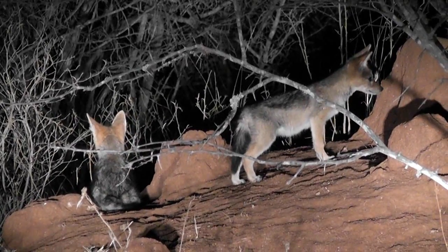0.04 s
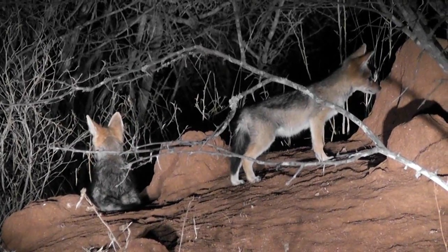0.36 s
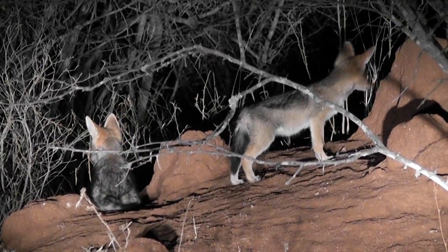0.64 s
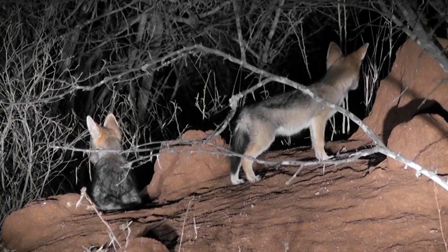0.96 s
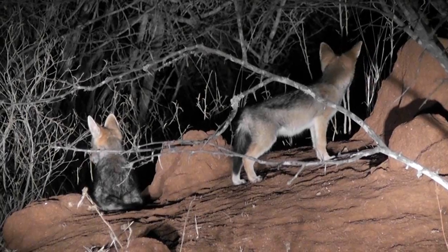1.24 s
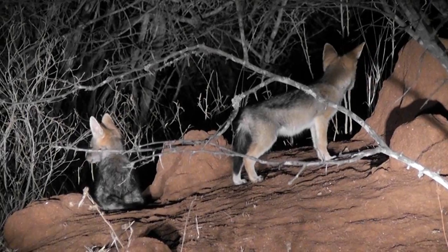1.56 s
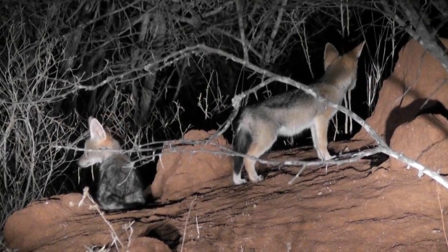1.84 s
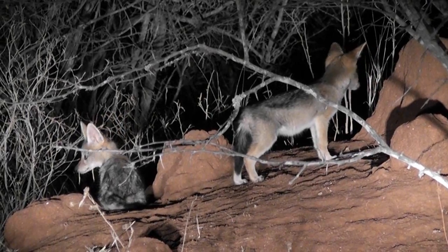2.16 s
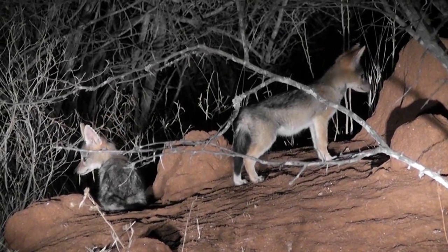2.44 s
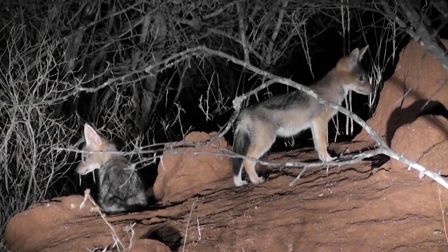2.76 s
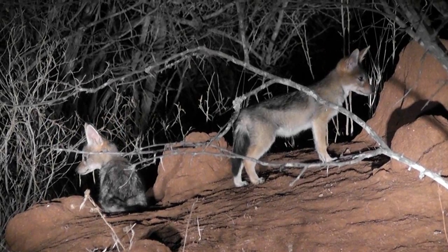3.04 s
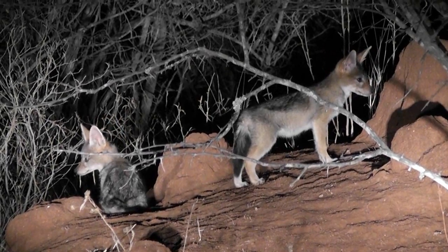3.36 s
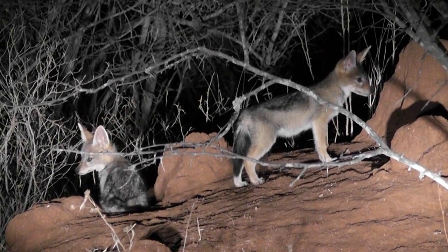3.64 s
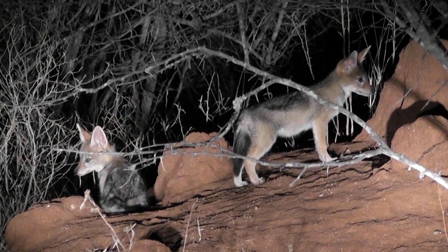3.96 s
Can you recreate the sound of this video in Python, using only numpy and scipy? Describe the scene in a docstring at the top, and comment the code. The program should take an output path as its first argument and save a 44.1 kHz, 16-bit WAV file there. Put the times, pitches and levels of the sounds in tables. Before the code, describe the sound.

An animal whines at once, low and creaky, rising in pitch and fading by 0.8 seconds, while a thin howl swoops far to the right. The howl returns at 1 second and yodels until about 1.9. From 3.2 seconds a second low whine swells into a rough creak. Throughout, crickets chirp, katydids rasp and another insect rattles over a distant insect chorus, night hiss and a faint low hum.

```python
"""Night among rocks and brush. At once an animal whines, its vocal folds creaking an octave down by period
doubling, while far to the right a thin howl, perhaps a coyote, swoops. The howl returns after a second
and ends in a yodel; two faint far tones come and go. After three seconds a second low whine breaks into
a rough creak. Throughout, crickets, katydids and a rattling insect stridulate over a distant insect
chorus, hiss and a low hum."""
import sys
import numpy as np
from scipy import signal
from scipy.fft import rfft, irfft
from scipy.io import wavfile
from scipy.ndimage import uniform_filter1d

SR = 44100
rng = np.random.default_rng(int(sys.argv[2]) if len(sys.argv) > 2 else 0)


def int16_out(signal):
    """Quantize to a 16-bit WAV file."""
    q = np.round(np.clip(np.atleast_2d(signal).T, -1, 1) * 32767)
    wavfile.write(sys.argv[1], SR, q.astype(np.int16))


N = 176400
T = np.arange(N) / SR

# One contour per whine: t/s, f/Hz, level/dB, subharmonic gain/dB, spectral tilt/(dB per octave)
WHINE_CONTOURS = [
    [(0, 241.7, -39.5, -4, 3), (.15, 240, -38.5, -4, 1.5), (.264, 243, -41, -6.5, -3),
     (.38, 249.2, -39.5, -8.5, -1.5), (.428, 262.2, -39.5, 7, 10), (.46, 297, -37.5, -12, -4),
     (.48, 309, -36.5, -29, -3), (.51, 327.5, -35.5, -40, 5), (.525, 353, -46.5, -30, 13),
     (.56, 396, -40.5, -28, -19), (.6, 480, -36, -34, -15), (.636, 583, -43.5, -29, 2),
     (.665, 634, -33, -10, 16.5), (.69, 571, -31.5, -28, -8), (.705, 495, -38, -38, -3),
     (.725, 455, -50.5, -16, 2), (.755, 420, -56, -25, -13)],
    [(3.19, 176, -72, -35, 4), (3.235, 184.8, -59.5, -33, 1), (3.29, 191.6, -50.5, -33, 7.5),
     (3.35, 204.7, -52.5, -28, -2), (3.42, 212, -50, -21, 2), (3.55, 225.6, -51, -26, 1.5),
     (3.62, 228.5, -48.5, -17, -4), (3.7, 235.3, -45.5, -8, -3), (3.76, 235.7, -42.5, 8.5, 2),
     (3.84, 241.5, -41, 7, 4.5), (3.914, 246.9, -40.5, 14, 4), (4, 253.3, -40, 9, 8)],
]
# Throat response for each whine: f/Hz, gain/dB
THROAT_RESPONSES = [
    [(110, -51), (240, -28.5), (305, -24), (360, 7.5), (480, -4.5), (610, 2.5), (725, 4.5), (785, -7),
     (850, -14), (950, -32.5), (1130, -29), (1245, -26), (1340, -44), (1900, -55)],
    [(110, -29), (235, -14), (305, -3), (360, 9.5), (470, 3.5), (600, 3.5), (720, 4.5), (815, 7.5),
     (870, -12.5), (940, -9.5), (1030, -25), (1180, -30), (1320, -21.5), (1480, -37), (1900, -35)],
]
# Roughness of the last creak: t/s, modulation depth
ROUGHNESS = [(3.55, 0), (3.7, 0.09), (3.8, 0.06), (3.9, 0.2), (4, 0.19)]

def whine(contour, throat):
    """Source and filter: folds drive a closed throat; alternating strong and weak pulses add f/2 lines."""
    gate, hz, db, creak_db, tilt_db = follow(contour)
    hz = uniform_filter1d(hz, size=500) * (1 + .0019 * drift(hz=50))
    phase = 2 * np.pi * np.cumsum(hz) / SR
    roughness = follow(ROUGHNESS)[1]
    wander_rad = .068 + .7 * roughness
    voice = power = 0
    for k in np.arange(1, 16) / 2:
        partial_db = read(throat, k * hz) + tilt_db * np.log2(k) + creak_db * (k % 1 > 0)
        gain = amp(partial_db) * (k * hz < 2000)
        lag_rad = 3.61 * (k * hz / 600) ** 2  # the throat delays the upper partials
        voice += gain * np.cos(k * phase - lag_rad + wander_rad * drift(hz=25))
        power += gain ** 2 / 2
    flutter = 1 + roughness * (np.cos(phase / 4) + .4 * drift(hz=60))  # swells every fourth pulse
    return gate * amp(db) * flutter * voice / np.sqrt(power)


def whining_animal(echo_s=.03):
    """Reflection: the direct whines are followed by an echo off the rock and faint reverberation."""
    voice = sum(whine(contour, throat) for contour, throat in zip(WHINE_CONTOURS, THROAT_RESPONSES))
    echo = np.interp(T - echo_s, T, voice, left=0)
    return voice + amp(-16) * echo + amp(-18) * reverberation(voice).mean(0)


# One contour per howl: t/s, f/Hz, relative level/dB
HOWL_CONTOURS = [
    [(0, 1700, -56), (.04, 2020, -52), (.066, 1350, -61), (.09, 1200, -73), (.2, 1174, -70),
     (.3, 1286, -65), (.42, 1454, -53.5), (.48, 1740, -58), (.55, 1955, -60), (.632, 2140, -61),
     (.652, 1626, -55), (.69, 1440, -54), (.74, 1444, -66), (.77, 1422, -83)],
    [(1.035, 1580, -55), (1.065, 1950, -60), (1.097, 2030, -53), (1.12, 1338, -58), (1.145, 1233, -70),
     (1.18, 1420, -59), (1.225, 1800, -60), (1.385, 2160, -63), (1.418, 1555, -50.5), (1.46, 1365, -60.5),
     (1.63, 1343, -59), (1.78, 1330, -57.5), (1.83, 1347, -66), (1.88, 1295, -70)],
]
# Upward breaks of the yodel: t/s, rise in f/Hz
YODEL_BREAKS = [(1.508, 669), (1.594, 617), (1.675, 539), (1.747, 529), (1.805, 262)]

def howling_animal(break_s=.021):
    """Frequency modulation: a nearly pure far voice swoops and breaks upward in a yodel."""
    breaks = sum(rise * np.exp(-((T - t) / break_s) ** 2) for t, rise in YODEL_BREAKS)
    voice = 0
    for contour in HOWL_CONTOURS:
        gate, hz, db = follow(contour)
        hz = (uniform_filter1d(hz, size=600) + breaks) * (1 + .004 * drift(hz=77))
        voice += gate * amp(db - 3.5 + 2 * drift(hz=25)) * tone(hz)
    return pan(db=-22.5) * voice + amp(-7) * reverberation(voice)


# Chirps: onset t/s, crest level/dB, left minus right level/dB
CRICKET_CHIRPS = [(0.104, -46.5, -12), (0.515, -44.5, -11), (.943, -44, -10), (1.38, -45.5, -13),
                  (1.807, -46, -9), (2.26, -45, -18), (2.68, -44.5, -12), (3.122, -45, -11),
                  (3.608, -46, -11)]
# Wing tone through a chirp: fraction of its duration, f/Hz
CHIRP_GLIDE = [(0, 4000), (.25, 4025), (.6, 4100), (.8, 4122), (1, 4080)]

def cricket(chirp_s=.1064):
    """Stridulation: each chirp is one wing tone that swells, rises in pitch and stops short."""
    fraction, hz = np.transpose(CHIRP_GLIDE)
    song = 0
    for start, db, pan_db in CRICKET_CHIRPS:
        progress = (T - start) / chirp_s
        gate = uniform_filter1d(1. * ((progress > 0) & (progress < 1)), size=400)
        swell = amp(db + np.interp(progress, [0, .63, 1], [-13, 0, -5]))
        song += pan(pan_db) * gate * swell * tone(np.interp(progress, fraction, hz))
    song *= 1 + .16 * drift(hz=220)
    return song + pan(db=2) * amp(-15.5) * reverberation(song.mean(0))


def wing_strokes(first_s, period_s, stroke_s, teeth_hz, ring_s, scatter_s, uneven_db, width):
    """Impulse excitation: each stroke is a run of tooth strikes, each a decaying burst of noise."""
    strikes = np.zeros(N)
    for n, (late, size, speed) in enumerate(rng.uniform(-1, 1, (100, 3))):
        teeth = stroke_s * teeth_hz * (1 + .08 * speed)
        position = np.arange(-1, 1, 2 / teeth)
        centre_s = first_s + n * period_s + scatter_s * late
        at = np.round((centre_s + position * stroke_s / 2) * SR).astype(int)
        inside = (at >= 0) & (at < N)
        force = amp(uneven_db * size) * np.cos(position * np.pi / 2)
        strikes[at[inside]] += force[inside]
    grit = rng.standard_normal(N) + width * rng.standard_normal((2, N))
    return signal.lfilter([1], [1, -np.exp(-1 / (ring_s * SR))], strikes) * grit


# Wing spectrum: f/Hz, relative level/dB
KATYDID_SPECTRUM = [(6000, -34), (8200, -21.5), (10000, -11.5), (11500, -3), (13200, 2.5), (14400, 4.5),
                    (15700, -5.5)]
# First katydid: t/s, level/dB
SHUFFLE_LEVEL = [(0, -52), (.2, -53), (.26, -56.5), (.4, -50), (.6, -55.5), (.75, -52), (1.3, -52),
                 (1.37, -59), (1.45, -49.5), (1.95, -51.5), (2.12, -57), (2.35, -52), (2.7, -51.5),
                 (3.25, -55.5), (3.55, -50.5), (3.7, -54.5), (4, -53)]
# Bouts of the second: onset t/s, end t/s
SINGING_BOUTS = [(0, 0.25), (.3, .53), (.67, 1.33), (1.42, 2.08), (2.3, 2.95), (3.35, 4.7), (3.8, 4.7)]

def katydids():
    """Broadband stridulation: one katydid shuffles its wings without pause; a second joins in bouts."""
    steady = wing_strokes(first_s=.018, period_s=.052, stroke_s=.032, teeth_hz=403,
                          ring_s=.00059, scatter_s=.0025, uneven_db=1.5, width=.57)
    second = wing_strokes(first_s=0, period_s=.037, stroke_s=.052, teeth_hz=439,
                          ring_s=.00079, scatter_s=.0025, uneven_db=1.5, width=.37)
    steady = in_brush(steady, KATYDID_SPECTRUM, pan_db=0, wet_db=-5)
    second = in_brush(second, KATYDID_SPECTRUM, pan_db=0, wet_db=-5)
    singing = np.any([(T > start) & (T < end) for start, end in SINGING_BOUTS], axis=0)
    gate = uniform_filter1d(1. * singing, size=1500)
    return amp(follow(SHUFFLE_LEVEL)[1]) * steady + amp(-56) * gate * second


# Spectrum of the ticks: f/Hz, relative level/dB
RATTLE_SPECTRUM = [(1200, -39), (1600, -14), (1950, -3.5), (2250, -7.5), (2550, -2), (3200, -13.5),
                   (3800, -1.5), (4400, -33), (7000, -23)]

def rattling_insect(first_s=.048, period_s=.0974):
    """Two-way stridulation: a strong stroke of dry ticks alternates with a weaker back stroke."""
    fore = wing_strokes(first_s, period_s, stroke_s=.052, teeth_hz=288.6,
                        ring_s=.0006, scatter_s=.007, uneven_db=2.2, width=.65)
    back = wing_strokes(first_s + period_s / 2, period_s, stroke_s=.045, teeth_hz=289.4,
                        ring_s=.0006, scatter_s=.0076, uneven_db=2.2, width=.84)
    rattle = in_brush(fore + amp(-4.5) * back, RATTLE_SPECTRUM, pan_db=6.5, wet_db=-4)
    return amp(-55.5 - .5 * T) * rattle


# Short falling chirps: onset t/s, crest level/dB
FAR_CHIRPS = [(.075, -73), (.44, -65), (.8, -80), (1.16, -56), (1.522, -60), (1.885, -58), (2.25, -63),
              (2.579, -68), (2.89, -61), (3.3, -57), (3.68, -64)]

def far_cricket(chirp_s=.055, top_hz=3730, drop_hz=330):
    """Frequency follows wing speed: each chirp sags in pitch as the wing slows."""
    song = 0
    for start, db in FAR_CHIRPS:
        progress = np.clip((T - start) / chirp_s, 0, 1)
        swell = np.sqrt(np.sin(np.pi * progress))
        song += amp(db) * swell * tone(top_hz - drop_hz * progress ** 1.54)
    return pan(db=-10) * song + amp(-16) * reverberation(song)


# Faint far tones: onset t/s, end t/s, f/Hz, crest level/dB
FAR_TONES = [(1.4, 1.95, 334.6, -74.5), (2.815, 3.12, 336.4, -71)]

def far_tones():
    """Amplitude envelope: soft tones of almost constant frequency swell and fade."""
    tones = 0
    for start, end, hz, db in FAR_TONES:
        progress = np.clip((T - start) / (end - start), 0, 1)
        tones += amp(db) * np.sqrt(np.sin(np.pi * progress)) * tone(hz + 3 * drift(hz=13))
    return tones


# Chorus spectrum: f/Hz, relative level/dB
CHORUS_SPECTRUM = [(1500, -21), (3000, -12), (3450, -13.5), (3800, 0.5), (4000, -2.5), (4300, -23),
                   (4600, -13), (4800, -12.5), (5100, -10), (5700, -18.5), (6450, -7), (6900, -14),
                   (7500, -24), (9000, -39)]
# Likeness of left and right: f/Hz, correlation
CHORUS_CORRELATION = [(3000, 0.2), (4000, 0.067), (5000, 0.65), (7000, 0.84)]

def insect_chorus():
    """Incoherent superposition: many distant insects merge into bands of noise."""
    return amp(-54.5) * pan(db=.5) * diffuse_noise(CHORUS_SPECTRUM, CHORUS_CORRELATION, patchy_db=3)


# Spectrum of the night air: f/Hz, relative level/dB
AIR_SPECTRUM = [(20, 6), (35, 12.5), (55, -2.5), (75, -12.5), (110, -9), (200, -17), (400, -20.5),
                (800, -29), (1150, -33), (1600, -27), (2500, -21), (8000, -38), (12000, -15.5),
                (15500, -23.5)]
# Likeness of left and right: f/Hz, correlation
AIR_CORRELATION = [(30, -0.48), (70, 0.059), (200, 0.061), (1000, 0.46), (3000, 0.71), (12000, 0.17)]

def night_air():
    """Broadband ambient noise: a deep rumble under a thin hiss."""
    return amp(-51) * diffuse_noise(AIR_SPECTRUM, AIR_CORRELATION, patchy_db=2.1)


def hum(hz=88.9):
    """Random modulation: a low tone wavers in amplitude and frequency."""
    waver = 1 + .34 * drift(hz=5.9)
    return amp(-62.5) * unit(waver * tone(hz + 1.88 * drift(hz=5.9)))


# Reverberation time of rocks and brush: f/Hz, T60/s
DECAY_TIMES = [(300, 0.29), (1500, .7), (4000, 0.5), (12000, 0.13)]

def reverberation(x):
    """Diffuse reflection: a stereo tail decays exponentially, each band at its own rate."""
    hz, t, noise = signal.stft(rng.standard_normal((2, SR)), SR, nperseg=256)
    decay = amp(-60 * t / read(DECAY_TIMES, hz)[:, None])
    onset = np.minimum(t / .02, 1)
    tail = signal.istft(noise * decay * onset, SR, nperseg=256)[1]
    return signal.fftconvolve(x[None], tail / np.linalg.norm(tail[0]), axes=1)[:, :N]


def in_brush(x, spectrum, pan_db, wet_db):
    """Scattering: direct and scattered sound add and take on the insect's spectrum, at rms 1."""
    field = pan(pan_db) * x + amp(wet_db) * reverberation(x.mean(0))
    response = amp(read(spectrum, np.fft.rfftfreq(N, 1 / SR)))
    return unit(irfft(rfft(field) * response, N))


def diffuse_noise(spectrum, correlation, patchy_db):
    """Partial coherence: left and right share part of a noise with drifting spectral patches."""
    frames, hz = N // 512 + 5, np.fft.rfftfreq(2048, 1 / SR)
    a, b, c, d, patches = rng.standard_normal((5, frames, len(hz)))
    patches = uniform_filter1d(patches, size=6, axis=0)
    patches = unit(uniform_filter1d(patches, size=10, axis=1))
    shared = read(correlation, hz)
    left = a + 1j * b
    right = shared * left + np.sqrt(1 - shared ** 2) * (c + 1j * d)
    bands = np.array([left, right]) * amp(read(spectrum, hz) + patchy_db * patches)
    return unit(signal.istft(bands.transpose(0, 2, 1), nperseg=2048, noverlap=1536)[1][:, :N])


def amp(db):
    """Amplitude ratio of a level."""
    return 10 ** (np.asarray(db) / 20)


def unit(x):
    """Normalisation to rms 1."""
    return x / np.sqrt(np.mean(x ** 2) + 1e-20)


def tone(hz):
    """Sinusoid of rms 1 whose phase is the integral of frequency."""
    return np.sqrt(2) * np.sin(2 * np.pi * np.cumsum(hz) / SR)


def read(points, hz):
    """Interpolation on a log-frequency axis."""
    f, value = np.transpose(points)
    return np.interp(np.log(hz + 1), np.log(f + 1), value)


def follow(contour):
    """Interpolation in time: a gate over the contour's span, then each column."""
    t, *columns = np.transpose(contour)
    gate = uniform_filter1d(1. * ((T >= t[0]) & (T <= t[-1])), size=300)
    return [gate] + [np.interp(T, t, column) for column in columns]


def pan(db):
    """Left and right gains for a level difference."""
    return unit(amp(np.array([[db], [-db]]) / 2))


def drift(hz):
    """Random fluctuation: low-pass noise of rms 1."""
    rolloff = 1 + (np.fft.rfftfreq(N, 1 / SR) / hz) ** 4
    return unit(irfft(rfft(rng.standard_normal(N)) / rolloff, N))


def scene():
    """Superposition: the pressures of all sources add."""
    background = night_air() + insect_chorus() + hum()
    voices = whining_animal() + far_tones() + howling_animal()
    return background + voices + cricket() + far_cricket() + katydids() + rattling_insect()


def record(dry, cutoff_hz=15800):
    """Band limiting: a steep low-pass filter removes the highest treble."""
    lowpass = signal.firwin(511, cutoff_hz, window=("kaiser", 9), fs=SR)
    return signal.oaconvolve(dry, lowpass[None], "same")


dry = scene()
out = record(dry)
int16_out(out)
```